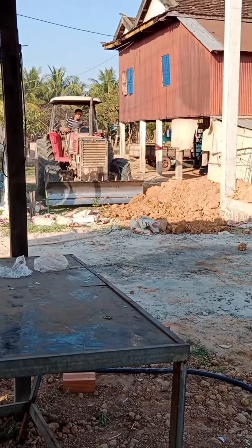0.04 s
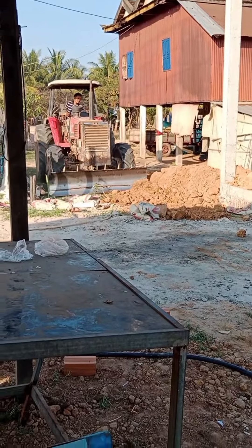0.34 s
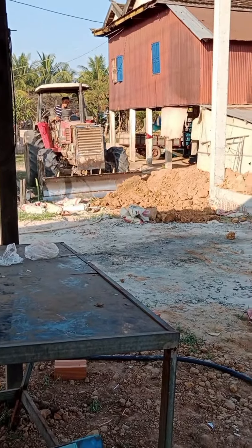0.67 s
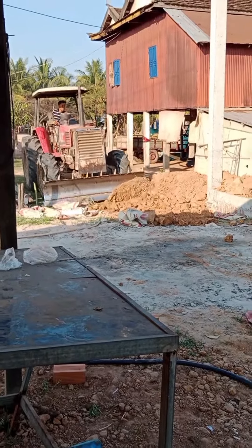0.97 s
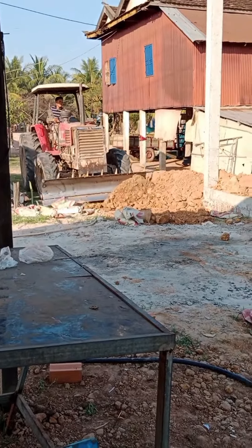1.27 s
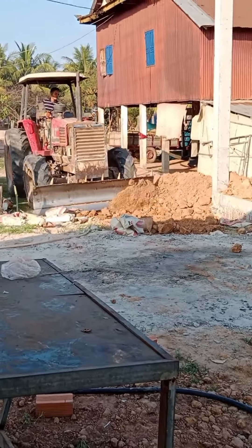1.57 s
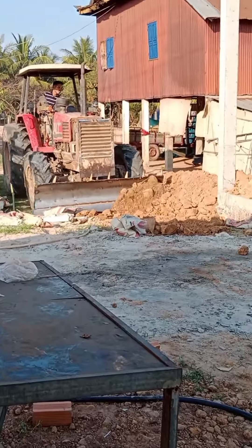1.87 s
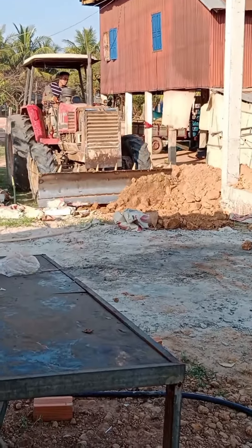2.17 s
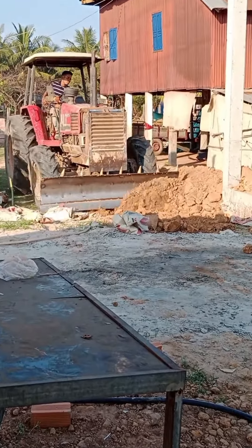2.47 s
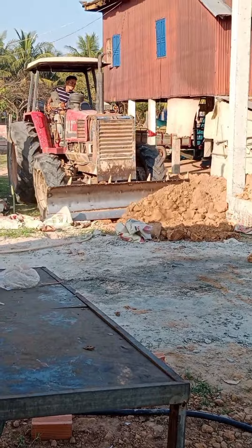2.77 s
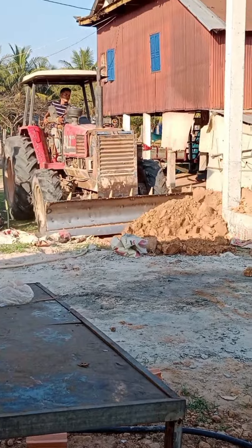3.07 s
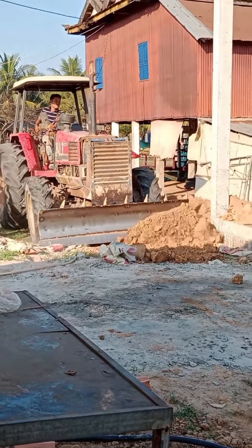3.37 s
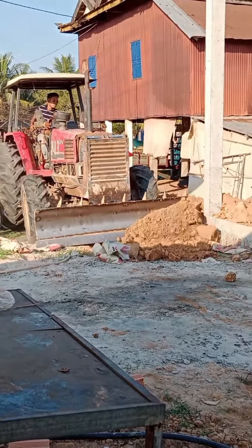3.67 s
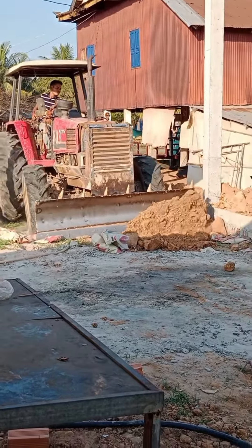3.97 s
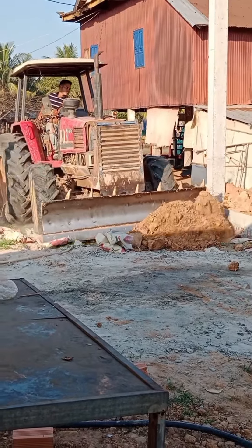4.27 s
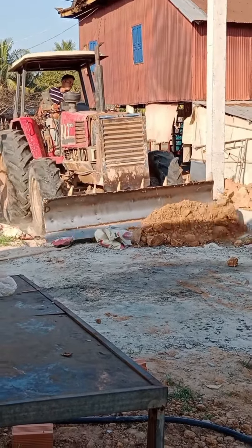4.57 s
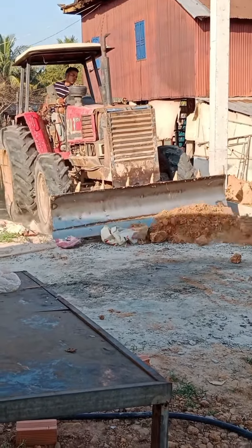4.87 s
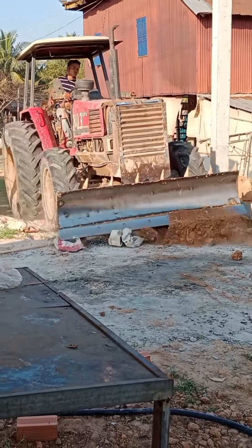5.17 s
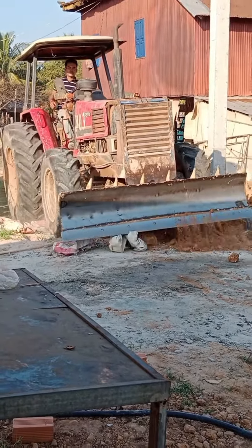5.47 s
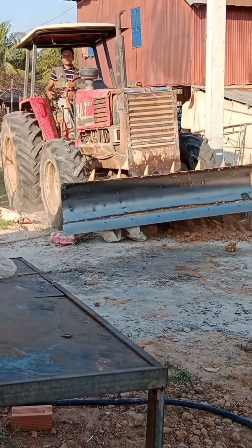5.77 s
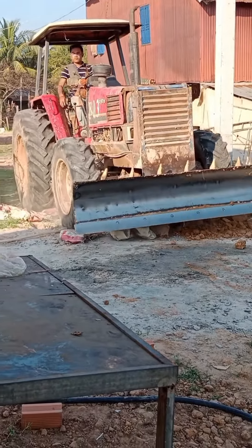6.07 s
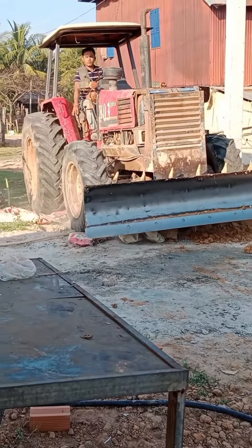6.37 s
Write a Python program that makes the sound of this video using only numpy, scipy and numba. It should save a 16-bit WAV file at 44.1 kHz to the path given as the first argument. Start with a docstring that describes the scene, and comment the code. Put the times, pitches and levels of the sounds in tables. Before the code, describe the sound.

A diesel tractor runs throughout in an open yard, with an uneven metallic rattle, clanking loose steel and a low rumble as its blade pushes soil and rubble. At about 0.6 seconds the blade hits rubble with a ringing clang, a boom and a scrape, and dry earth hisses faintly. A panel buzzes around 1 second. The engine eases and dips briefly between about 1.7 and 2.5 seconds, then grating returns. At 3 seconds a stone clinks sharply, with light steel pings until nearly 4 seconds. From about 4 to 5.7 seconds the tractor sounds nearer and louder, speeding up and barking in repeated surges with clanks, scrapes and deep thuds, the heaviest near 4.9 seconds. From about 5.8 seconds the engine slows and quietens with a falling gear whine, still running at the end, around 6.6 seconds.

```python
"""A diesel tractor pushes a heap of soil and rubble across a yard with its front blade, coming nearer.
Each firing shakes the block and tinwork; under load the engine barks in surges, then slows with a
falling gear whine. The blade booms, scrapes and clangs in the heap while the ground rumbles and soil
crumbles off it. Loose steel clanks and pings, a panel buzzes, and a struck stone clinks."""
import sys
import numpy as np
from scipy import signal
from scipy.fft import rfft, irfft
from scipy.io import wavfile
from scipy.ndimage import uniform_filter1d, map_coordinates
from numba import njit

SR = 44100
rng = np.random.default_rng(int(sys.argv[2]) if len(sys.argv) > 2 else 0)


def bounce(signal):
    """Save signal as a 16-bit WAV file at the path given by the first command-line argument."""
    frames = np.transpose(np.atleast_2d(signal))
    limited = np.clip(frames, -1, 1)
    pcm = np.round(limited * 32767).astype(np.int16)
    wavfile.write(sys.argv[1], SR, pcm)


N = 292632
TIME = np.arange(N) / SR


def undb(db):
    """Decibels to gain."""
    return 10 ** (np.asarray(db) / 20)


def unit(x):
    """Scale to rms 1."""
    return x / np.sqrt(np.mean(x ** 2) + 1e-20)


def curves(rows):
    """Automation lanes from rows of (t/s, values)."""
    s, *columns = np.transpose(rows)
    return [np.interp(TIME, s, c) for c in columns]


def walk(rate):
    """Smooth random drift of rms 1, through `rate` points a second."""
    steps = rng.standard_normal(8192)
    return unit(map_coordinates(steps, [TIME * rate], order=2, mode="wrap"))


def swell(s, length, attack_s, release_s):
    """Envelope that rises to 1 at time s, holds for length and dies away."""
    before = np.maximum((s - TIME) / attack_s, 0)
    after = np.maximum((TIME - s - length) / release_s, 0)
    return np.exp(-np.minimum(before + after, 30))


def swells(rows, attack_s, release_s):
    """Joint envelope of (t/s, length/s, level/dB) events."""
    return np.sqrt(sum((undb(db) * swell(s, length, attack_s, release_s)) ** 2
                       for s, length, db in rows))


def eq(x, points, size=2048):
    """Minimum-phase EQ through (f/Hz, gain/dB) points."""
    hz, db = np.transpose(points)
    freqs = np.maximum(np.fft.rfftfreq(size, 1 / SR), 1)
    cepstrum = irfft(np.log(undb(np.interp(np.log(freqs), np.log(hz), db))))
    cepstrum[1:size // 2] *= 2
    cepstrum[size // 2 + 1:] = 0
    return signal.fftconvolve(x, irfft(np.exp(rfft(cepstrum))))[:len(x)]


@njit
def sweep(x, hz, width):
    """State-variable band-pass whose centre may move."""
    y, band, low = np.empty(len(x)), 0., 0.
    for i in range(len(x)):
        g, damping = np.tan(np.pi * hz[i] / SR), width / hz[i]
        v = (band + g * (x[i] - low)) / (1 + g * (g + damping))
        band, low, y[i] = 2 * v - band, low + 2 * g * v, damping * v
    return y


def resonance(x, hz, width):
    """Band-pass parked on one pitch."""
    return sweep(x, np.full(len(x), float(hz)), float(width))


def even(x, seconds):
    """Leveller: take the slow swells out of a texture and leave its grain."""
    size = max(int(seconds * SR), 2)
    power = uniform_filter1d(uniform_filter1d(x ** 2, size), size)
    return x / np.sqrt(np.maximum(power, 0) + 1e-14)


def grains(rate, spread_db):
    """Tiny impacts of unequal size, about `rate` a second."""
    hit = rng.random(N) < rate / SR
    size = undb(spread_db * np.minimum(rng.exponential(size=N), 4))
    return unit(hit * size * rng.standard_normal(N))


def body(drive, modes, flicker_db, flicker_rate):
    """Shake (f/Hz, width/Hz, level/dB) resonances; the contact point wanders, so each comes and goes."""
    return sum(undb(db + flicker_db * walk(flicker_rate)) * (-1) ** k * resonance(drive, hz, width)
               for k, (hz, width, db) in enumerate(modes))


def ring_cloud(shake, band_hz, count, t60, spread_db, size):
    """Many short rings at random pitches in a band, as strong as the shaking when each starts."""
    when, pitch, strength, phase = rng.random((count, 4)).T
    start = (when * N).astype(int)
    hz = band_hz[0] + pitch * (band_hz[1] - band_hz[0])
    gain = shake[start] * undb(spread_db * np.minimum(-np.log(1 - strength), 4))
    t = TIME[:size]
    envelope = (1 - np.exp(-t / .0004)) * undb(-60 * t / t60)
    angle = 2 * np.pi * (hz[:, None] * t + phase[:, None])
    rings = gain[:, None] * envelope * np.sin(angle.astype(np.float32))
    return np.bincount((start[:, None] + np.arange(size)).ravel(), rings.ravel(), N)[:N]


def blow(modes, attack_s, detune):
    """One hit on (f/Hz, level/dB, t60/s) modes, peak 1; no two ring quite alike."""
    t = TIME[:SR // 4]
    hz, db, t60 = np.transpose(modes)[:, :, None]
    pitch, phase = rng.uniform(-0.99, 1, (2, len(modes), 1))
    rings = undb(db - 60 * t / t60) * np.sin(2 * np.pi * hz * (1 + detune * pitch) * t + np.pi * phase)
    out = rings.sum(0) * (1 - np.exp(-t / attack_s))
    return out / np.abs(out).max()


def add(track, s, sound):
    """Mix a sound in at time s."""
    i = max(int(s * SR), 0)
    track[i:i + len(sound)] += sound[:N - i]


# engine speed: t/s, firing rate/Hz
FIRING_RATE = [(0, 33.68), (.95, 33.53), (1.3, 32.04), (1.57, 33.98), (1.8, 32.27), (2.2, 30.83),
               (3.0, 30.23), (3.7, 30.25), (3.87, 31.14), (4.05, 33.76), (4.2, 36.11), (4.45, 35.1),
               (4.6, 37.09), (4.77, 35.54), (4.95, 37.87), (5.1, 36.02), (5.22, 37.47), (5.45, 35.03),
               (5.55, 39), (5.78, 36.85), (6.05, 33.45), (6.33, 30.62), (6.64, 27.9)]
# surges of load: hardest firing t/s, hold before/s, hold after/s, hardness/0-1, clatter/dB, bark/dB
SURGES = [(0.631, 0.0086, 0.0077, 0, -35.5, -37), (3.133, 0.0017, 0.049, 0, -40.5, -42.5),
          (3.706, 0.067, 0.073, 0.41, -36, -34.5), (4.051, 0.071, 0.053, 0.68, -34, -29),
          (4.305, 0.037, 0.038, 0.5, -31.5, -28.5), (4.498, 0.00058, 0.067, 0.81, -32, -24.5),
          (4.857, 0.048, 0.04, 0.67, -30.5, -22.5), (5.15, 0.012, 0.024, 0.86, -31, -24.5),
          (5.502, 0.026, 0.024, 0.8, -30.5, -24.5)]
SURGE_ATTACK_S, SURGE_RELEASE_S = 0.016, 0.046


def firings():
    """The engine's clock: seconds since the last firing, and how hard it is hitting."""
    rate, = curves(FIRING_RATE)
    cycles = np.cumsum(rate) / SR
    peaks = np.array(SURGES)[:, 0]
    offsets = np.unwrap(np.interp(peaks, TIME, cycles) % 1, period=1)
    cycles -= np.interp(TIME, peaks, offsets)  # every surge peaks on a firing
    hardness = sum(hard * swell(s - before, before + after, SURGE_ATTACK_S, release_s=0.031)
                   for s, before, after, hard, _, _ in SURGES)
    return cycles % 1 / rate, hardness


def beat(age, hardness, idle_depth, decay_s):
    """Envelope of each firing: a sharp blow that dies away, pumping deeper under load."""
    depth = np.clip(idle_depth + (1 - idle_depth) * hardness, 0, .95)
    pulse = (1 - np.exp(-age / .0013)) * np.exp(-age / decay_s)
    return even(1 - depth + depth * 3.4 * pulse, .04)


def strikes(age, gain, modes, scatter_db, colour_db, detune):
    """Each firing strikes (f/Hz, level/dB, t60/s) modes, never twice with the same force or colour."""
    out, t = np.zeros(N), TIME[:SR // 10]
    hz, db, t60 = np.transpose(modes)[:, :, None]
    for i in np.flatnonzero(np.diff(age) < 0) + 1:
        force, mix, pitch, phase = rng.standard_normal((4, len(modes), 1))
        decays = undb(db + colour_db * np.clip(mix, -1, 1) - 60 * t / t60)
        hit = (decays * np.sin(2 * np.pi * (hz * (1 + detune * pitch) * t + phase))).sum(0)
        hit *= 1 - np.exp(-t / .0016)
        add(out, i / SR, gain[i:i + SR // 200].max() * undb(scatter_db * np.tanh(force[0])) * hit)
    return out


# pushes, when the drive takes up load: t/s, length/s, clatter/dB, crumbling soil/dB
PUSHES = [(0, 0.078, -47, -67), (0.105, 0.23, -52.5, -66.5), (0.48, 0.043, -56, -65),
          (0.589, 0.48, -38, -57.5), (1.095, 0.498, -42.5, -61), (1.62, 0.026, -48, -63.5),
          (1.785, 0.24, -59, -77), (1.975, 0.11, -42, -61.5), (2.144, 0.03, -43, -63.5),
          (2.37, 0.24, -60, -73), (2.584, 0.53, -40, -58.5), (3.176, 0.42, -43, -58),
          (3.638, 0.22, -39.5, -59), (3.845, 0.12, -42, -57.5), (3.979, 1.805, -40, -57),
          (5.781, 0.54, -48.5, -67), (5.902, 0.027, -49, -67), (6.177, 0.019, -48, -76),
          (6.404, 0.21, -61, -81)]
# exhaust bark riding on the pushes: t/s, relative level/dB
EFFORT = [(0, -14), (1.0, -18), (1.4, -18), (2.1, -6.5), (2.7, -9.5), (3.5, -13.5), (3.9, -7), (4.2, 3),
          (4.7, -1.5), (5.35, 2.5), (5.7, -5.5), (5.95, 1.5), (6.3, -9.5), (6.64, 0.5)]
PUSH_ATTACK_S, PUSH_RELEASE_S, IDLE_DB = 0.013, 0.016, -70


def workload():
    """Envelopes of the steady pushing, the surges on top, and the bark both draw from the engine."""
    push = swells([(s, length, db) for s, length, db, _ in PUSHES], PUSH_ATTACK_S, PUSH_RELEASE_S)
    push = np.hypot(push, undb(IDLE_DB)) * undb(1.5 * walk(13))
    # the drive goes slack just before each surge
    slack = sum(np.exp(-((TIME - s + before + 0.078) / 0.014) ** 2) for s, before, *_ in SURGES)
    push *= undb(-1.5 * slack)
    peak, before, after, hardness, clatter_db, bark_db = np.transpose(SURGES)
    surge = swells(zip(peak - before, before + after, clatter_db), SURGE_ATTACK_S, SURGE_RELEASE_S)
    labour = swells(zip(peak - before, before + after, bark_db), SURGE_ATTACK_S, SURGE_RELEASE_S)
    accent = sum(hard * swell(s, 0.043, attack_s=0.0007, release_s=0.01)
                 for s, hard in zip(peak, hardness))
    labour *= undb(0.5 * accent)  # the hardest firing stands out
    effort_db, = curves(EFFORT)
    return push, surge, np.sqrt(labour ** 2 + (push * undb(effort_db)) ** 2 + undb(IDLE_DB) ** 2)


# resonances of block and tinwork: f/Hz, width/Hz, level/dB
TINWORK = [(955, 88, -15.5), (1103, 25.5, -3), (1360, 95, 0.5), (1464, 73, 2.5), (1544, 56, -1.5),
           (1782, 97, -3.5), (1884, 33, -1.5), (1974, 82, -2.5), (2378, 26, -9.5), (3217, 92, -5),
           (3820, 39, -13.5)]
# tone of the clatter: f/Hz, level/dB
CLATTER_EQ = [(150, -18), (400, 1), (650, -3), (830, -10.5), (960, -3.5), (1080, 4), (1190, 3), (1330, 1.5),
              (1600, 1.5), (1720, -1.5), (1900, -1.5), (2030, -4.5), (2130, -12), (2260, -1), (2450, 4),
              (2650, 3), (2930, -28), (3300, -11.5), (3550, -14.5), (3760, -6.5), (3950, -17),
              (5000, -21.5)]


def clatter(age, hardness, rattle):
    """Firings shake the block and tinwork into a gritty, metallic rattle."""
    shake = grains(2000, 2.5) * beat(age, hardness, idle_depth=0.039, decay_s=0.039)
    tin = body(shake, TINWORK, flicker_db=6.5, flicker_rate=18)
    return even(eq(tin, CLATTER_EQ), .03) * rattle * undb(-0.5)


# body of the exhaust bark: f/Hz, level/dB
BARK_EQ = [(130, -35.5), (300, -8.5), (480, 3.5), (630, -7.5), (750, 1), (830, 3.5), (920, 4), (1200, 2.5),
           (1500, 4), (2100, 1.5), (2500, -4), (2800, -18), (4000, -20.5), (5000, -48)]
# its bright edge: f/Hz, level/dB
BARK_EDGE_EQ = [(1500, -39), (2400, -8), (2750, -3.5), (3020, -3), (3300, 6), (3550, 4.5), (3800, -10),
                (4150, -29), (4500, -27), (4900, -31), (5400, -19), (6000, -21.5)]
# hollow resonances of the frame: f/Hz, width/Hz, level/dB
HOLLOWS = [(461, 78, -3.5), (726, 71, -8.5), (914, 89, -4.5), (1287, 27, -10.5), (1485, 100, -5.5),
           (1755, 13, -12.5), (1983, 27, -9), (2194, 40, -1), (3440, 290, -6)]
EDGE_DB, EDGE_KNEE_DB = -10.5, -35.5  # below the knee the edge fades faster than the bark


def exhaust_bark(age, hardness, effort):
    """Firings bark through the hollow frame, brighter the harder the engine works."""
    blows = beat(age, hardness, idle_depth=0.058, decay_s=0.0046)
    bursts = ring_cloud(blows, (300, 5500), count=14000, t60=.04, spread_db=1.4, size=1000)
    bark = eq(bursts, BARK_EQ)
    bark = even(bark + body(bark, HOLLOWS, flicker_db=5.5, flicker_rate=20), .028)
    edge = even(eq(bursts, BARK_EDGE_EQ), .028)
    brightness = undb(EDGE_DB) * np.minimum(effort / undb(EDGE_KNEE_DB), 1)
    duck = 1 - 0.27 * hardness  # makes room for the block's knocks
    return (bark + brightness * edge) * effort * duck


# modes of the loose bonnet: f/Hz, level/dB, t60/s
BONNET = [(1034, -3.5, 0.064), (1404, -1.5, 0.072), (1493, 1, 0.033), (1900, 1.5, 0.082), (2010, -7, 0.084),
          (2300, -20, 0.11), (3710, -38, 0.14), (4340, -28.5, 0.088), (7070, -30, 0.026)]
# modes of the engine block: f/Hz, level/dB, t60/s
BLOCK = [(351.4, -4.5, 0.074), (472.5, 2, .08), (717, -9.5, 0.061), (930, -5, 0.021), (1530, -1.5, 0.026),
         (2166, -3, 0.035), (3480, -8, 0.038), (3560, -15, 0.04), (4010, -16, 0.054), (4520, -20, 0.024),
         (5660, -36, 0.019), (6130, -15, 0.027), (7160, -12, 0.032)]


def slaps_and_knocks(age, hardness, rattle, effort):
    """Each firing slaps the bonnet and, under load, knocks the block."""
    slaps = strikes(age, rattle * undb(-5.5), BONNET, scatter_db=8, colour_db=6.5, detune=0.016)
    knocks = strikes(age, effort * hardness * undb(5.5), BLOCK, scatter_db=4, colour_db=0.5, detune=0.03)
    return slaps + knocks


# gear whine riding on the pushes: t/s, second harmonic/dB, third harmonic/dB
WHINE = [(0, -42, 6), (.15, -40, -33), (.62, -34, -13), (.8, -26, -13.5), (1.0, -15, -15), (1.2, -18, -18),
         (1.55, -14, -15.5), (1.75, 2.5, -8), (2.1, -12.5, -16), (2.6, -24, -32), (3.4, -12, -38),
         (3.9, -9, -15), (4.3, -12, -13), (5.0, -2.5, -15.5), (5.4, -4.5, -8), (5.75, -8, -23.5),
         (6.02, 3, -4.5), (6.12, -3, -27), (6.2, 4.5, -15), (6.32, -13.5, -14), (6.42, 6, -21),
         (6.64, 2, -36)]
MESHES_PER_FIRING, WHINE_FLUTTER, WHINE_ROUGHNESS = 33.6, .026, .9


def gear_whine(age, push):
    """Gear mesh tones with a rough fringe, fluttering with the uneven turning of the crank."""
    hz = MESHES_PER_FIRING * curves(FIRING_RATE)[0]
    kick = signal.sosfilt(signal.butter(3, 90, fs=SR, output="sos"), np.exp(-age / .012))
    flutter = 1 + WHINE_FLUTTER * (kick - kick.mean()) + 0.0032 * walk(12)
    phase = 2 * np.pi * np.cumsum(hz * flutter) / SR
    out = 0
    for k, db in enumerate(curves(WHINE), 2):
        fringe = walk(140) * np.sin(k * phase) + walk(140) * np.cos(k * phase)
        tone = np.sin(k * phase) + WHINE_ROUGHNESS * fringe
        out += undb(db - 1 + 3 * walk(24)) * even(tone * (1 + kick), .03)
    return out * push


# the blade catches in the heap: t/s, length/s, level/dB, starting f/Hz
BOOMS = [(0, 0.018, -42, 330), (0.192, 0.048, -46, 328), (0.487, 0.088, -49.5, 338),
         (0.6, 0.076, -36.5, 320), (0.66, 0.029, -32.5, 240), (0.64, 0.062, -41.5, 560),
         (0.68, .05, -32.5, 370), (0.753, 0.11, -41, 348), (0.961, 0.096, -37.5, 284),
         (1.238, 0.053, -41.5, 338), (1.411, 0.014, -40, 257), (1.469, 0.072, -39.5, 182),
         (1.848, 0.13, -57.5, 380), (1.99, 0.083, -39.5, 390), (2.174, 0.0072, -53, 280),
         (2.612, 0.015, -42.5, 338), (2.825, 0.055, -42.5, 322), (3.189, 0.051, -47, 416),
         (3.314, 0.13, -39, 405), (3.712, 0.12, -39, 495), (3.945, 0.073, -36.5, 382),
         (4.208, 0.2, -35.5, 365), (4.64, 0.037, -37.5, 322), (4.509, .02, -33, 486),
         (4.838, 0.021, -24, 475), (4.858, 0.018, -27.5, 135), (4.896, 0.034, -29, 258),
         (5.027, 0.067, -40.5, 330), (5.153, 0.03, -29.5, 440), (5.195, 0.03, -35.5, 276),
         (5.31, 0.053, -44.5, 310), (5.536, 0.016, -32.5, 327), (5.626, 0.073, -39, 492),
         (5.761, 0.025, -43.5, 321.4), (6.021, 0.015, -44, 256)]
# tone of its broad thud: f/Hz, level/dB
BOOM_EQ = [(60, -34), (130, -5), (250, 0.5), (500, -7), (640, -41.5), (1000, 1.5), (3000, -14.5)]
DRAG_DB, DRAG_HZ, SAG_HZ_PER_S = -7.5, 403, 416  # drag level is relative to the bark


def blade_boom(age, hardness, effort):
    """The blade drones as it drags and booms as it catches, sagging in pitch as soil piles up."""
    power = (effort * undb(DRAG_DB)) ** 2
    weighted_hz = power * DRAG_HZ
    for s, length, db, start_hz in BOOMS:
        catch = (undb(db) * swell(s, length, attack_s=0.02, release_s=0.017)) ** 2
        power += catch
        weighted_hz += catch * (start_hz - SAG_HZ_PER_S * (TIME - s))
    hz = np.clip(weighted_hz / power, 100, 700)  # the loudest boom leads the pitch
    drag = grains(1500, 1.8) * beat(age, hardness, idle_depth=0.18, decay_s=0.0032)
    hum = even(sweep(sweep(drag, hz, 60.), hz, 300.), .022)
    thud = even(eq(sweep(drag, hz, 49.), BOOM_EQ), 0.11)
    broad = np.clip(0.41 + 0.13 * hardness, 0, 1)  # hard blows excite a broader band
    boom = unit(even((1 - broad) * hum + broad * thud, 0.044))
    return boom * np.sqrt(power) * undb(2.2 * walk(18))


# weight of the ground: f/Hz, level/dB
RUMBLE_EQ = [(20, -20), (35, -11), (48, -12), (62, 0), (79, -3.5), (100, 3.5), (130, -6), (180, -14.5),
             (300, -16), (600, -75.5)]
# heavy thuds through the ground: t/s, length/s, level/dB
THUDS = [(.97, 0.081, -46), (1.505, 0.025, -39), (2.06, .015, -57), (2.635, 0.051, -44),
         (2.75, 0.0085, -48), (3.72, 0.039, -48), (4.07, .03, -41), (4.2, 0.016, -38), (4.53, 0.05, -36),
         (4.855, 0.016, -22), (4.91, 0.057, -34), (5.04, 0.04, -44), (5.19, 0.033, -33.5),
         (5.52, 0.06, -34.5), (5.98, 0.014, -46)]
ROLL_DB, USUAL_PUSH_DB, IDLE_RUMBLE_DB = -53, -40, -89


def ground_rumble(age, hardness, push):
    """The ground rolls with the load and thuds, deepest around the surges, when the machine strains."""
    shake = grains(900, 0.97) * beat(age, hardness, idle_depth=0.46, decay_s=0.0081)
    deep = unit(eq(shake, RUMBLE_EQ))
    shallow = unit(eq(deep, [(45, -9), (75, -13.5), (110, -7.0), (170, -0.5)]))
    shudder = even(resonance(deep, hz=79, width=7), 0.079)  # the frame's own low note
    strain = np.clip(3 * uniform_filter1d(hardness, SR // 4), 0, 1)
    heavy = even(strain * (deep + undb(-5) * shudder) + (1 - strain) * shallow, 0.0079)
    thuds = heavy * swells(THUDS, attack_s=0.011, release_s=0.014)
    rolling = np.hypot(undb(ROLL_DB) * (push / undb(USUAL_PUSH_DB)) ** 0.55, undb(IDLE_RUMBLE_DB))
    return (thuds + even(shallow, .04) * rolling) * undb(2.2 * walk(22))


# soil sliding off the heap: t/s, length/s, level/dB
SPILLS = [(0, 0.028, -49), (.578, 0.12, -48.5), (.88, 0.13, -54), (2.81, 0.11, -55), (3.03, 0.12, -56.5),
          (3.85, 0.0088, -46.5), (5.23, 0.22, -51), (6.09, 0.012, -55.5)]
# tone of crumbling earth: f/Hz, level/dB
CRUMBLE_EQ = [(3500, -13), (4400, -8), (4900, -23), (5300, -16.5), (5900, -14.5), (6550, 8.5), (7150, 1.5),
              (7700, 5.5), (8900, 3.5), (9500, -4), (10200, -4), (11400, -16), (12800, -14.5), (13800, -29),
              (15500, -25)]
# air on the hiss, a shelf above AIR_HZ: t/s, level/dB
AIR = [(0, -21), (.6, -2), (.64, 13), (.72, -10), (1.0, -7), (2.1, 7), (2.7, 1), (3.1, 0), (3.7, -1),
       (4.2, 10), (5.35, 11.5), (5.6, -1), (6.64, 11)]
AIR_HZ, SURGE_SOIL_DB, IDLE_SOIL_DB = 11250, -15, -76.5


def soil(age, hardness, surge):
    """Dry earth hisses off the heap and chips tinkle in it, shaken loose in time with the engine."""
    pushed = swells([(s, length, db) for s, length, _, db in PUSHES], PUSH_ATTACK_S, PUSH_RELEASE_S)
    spilled = swells(SPILLS, attack_s=0.0067, release_s=0.016)
    shaken = surge * undb(SURGE_SOIL_DB)
    flow = np.sqrt(pushed ** 2 + spilled ** 2 + shaken ** 2 + undb(IDLE_SOIL_DB) ** 2)
    shake = beat(age, hardness, idle_depth=.15, decay_s=.012) * undb(2.5 * walk(45))
    chips = ring_cloud(shake, (3800, 15500), count=10000, t60=.05, spread_db=2.3, size=1300)
    earth = unit(shake * rng.standard_normal(N)) * (.75 + .6 * hardness)
    crumbs = even(eq(unit(chips) + earth, CRUMBLE_EQ), .03)
    air = signal.sosfiltfilt(signal.butter(4, AIR_HZ, "high", fs=SR, output="sos"), crumbs)
    air_db, = curves(AIR)
    return (crumbs - air + air * undb(air_db)) * flow * undb(0.49 * walk(16))


# hits on loose steel: t/s, peak level/dB, favoured f/Hz
CLANKS = [(0.036, -30.5, 1570), (.127, -39.5, 1790), (0.201, -33.5, 1370), (0.281, -38, 1810),
          (.438, -45, 1750), (0.763, -37, 1860), (0.927, -29, 1550), (1.082, -28, 1430), (1.097, -33, 1800),
          (1.166, -29.5, 1450), (1.225, -28.5, 1840), (1.276, -31, 1830), (1.311, -32, 1420),
          (1.352, -34, 1460), (1.438, -28.5, 1860), (1.462, -27, 1430), (1.611, -30.5, 1870),
          (1.788, -42, 1710), (1.965, -37, 1870), (2.156, -42, 1850), (2.17, -33.5, 1370),
          (2.351, -47.5, 1700), (2.57, -30.5, 1360), (2.669, -32, 1380), (2.964, -29.5, 1840),
          (2.982, -26.5, 1440), (3.123, -25, 1420), (3.329, -27.5, 1480), (3.489, -29, 1390),
          (3.54, -31, 1460), (3.577, -25.5, 1380), (3.608, -24, 1440), (3.64, -28, 1480),
          (3.991, -23.5, 1400), (4.05, -21.5, 1470), (4.468, -24, 1520), (4.499, -23, 1490),
          (4.772, -20, 1537), (4.804, -24, 1630), (5.095, -23, 1520), (5.153, -23, 1520),
          (5.446, -20.5, 1740), (6.067, -31, 1730)]
# modes of the loose steel: f/Hz, level/dB, t60/s
STEEL = [(1056, -16, 0.056), (1358, -3, 0.065), (1465, -0.5, 0.049), (1566, -1.5, 0.067), (1830, 2, 0.047),
         (1894, -6.5, 0.09), (1992, -4.5, 0.052), (2370, -15, 0.048), (3590, -10, 0.036),
         (6900, -10, 0.057), (7800, -16, .04)]
FOCUS_DB, FOCUS_WIDTH_HZ = 14, 200


def steel_clanks():
    """Loose parts clank with a tick of contact; the struck spot favours the modes near one pitch."""
    out = np.zeros(N)
    tick_eq = [(200, -4), (1000, 4), (2500, 0.5), (4000, -14),
               (5200, -19.5), (6600, -15), (9000, -4), (12000, -23)]
    for s, db, favoured_hz in CLANKS:
        modes = [(hz, level + FOCUS_DB * np.exp(-((hz - favoured_hz) / FOCUS_WIDTH_HZ) ** 2), t60)
                 for hz, level, t60 in STEEL]
        add(out, s, undb(db) * blow(modes, attack_s=0.0019, detune=0.022))
        tick = eq(rng.standard_normal(1200) * np.exp(-TIME[:1200] / 0.0069), tick_eq)
        add(out, s, undb(db - 17.5) * tick / np.abs(tick).max())
    return out


# rubble grating along the blade: t/s, length/s, level/dB, rasp f/Hz, width/Hz
GRATES = [(0.571, 0.039, -37.5, 3500, 1100), (0.606, 0.039, -30.5, 2700, 400),
          (0.601, 0.077, -38, 4250, 900), (0.87, 0.21, -44.5, 3560, 450), (1.991, 0.064, -43.5, 2520, 800),
          (2.606, 0.04, -43.5, 2630, 800), (2.804, 0.054, -37, 2700, 900), (2.893, 0.04, -31.5, 3220, 700),
          (2.928, 0.15, -46, 2630, 400), (3.117, 0.079, -35, 2380, 800), (3.67, 0.15, -38.5, 3150, 1200),
          (4.311, 0.0087, -23, 3520, 400), (4.931, 0.058, -28, 3050, 900)]
# tone of the grit: f/Hz, level/dB
SCRAPE_EQ = [(300, 7), (900, 12), (1500, 32), (2500, 13), (3500, 3), (4200, -17), (4900, -26), (5600, 0),
             (6600, -12), (11000, -19), (15000, -40)]
# resonances of the blade's edge: f/Hz, width/Hz, level/dB
BLADE_EDGE = [(2656, 46, 2), (3080, 36, 3), (3354, 20, 11), (3646, 29, -10), (5500, 90, -14),
              (6220, 110, -12), (6950, 150, -12), (7800, 140, -28), (11140, 99, -19)]


def rubble_scrapes():
    """Lumps rasp along the blade and set its edge ringing."""
    out = np.zeros(N)
    grit = eq(grains(6000, 0.35), SCRAPE_EQ)
    edge = body(grains(2200, 0.83), BLADE_EDGE, flicker_db=6.5, flicker_rate=25)
    edge = undb(-12) * even(edge, 0.018)
    for s, length, db, hz, width in GRATES:
        progress = TIME[:SR // 4] / length
        envelope = (1 - np.exp(-progress / .15)) * np.exp(-progress ** 3)
        span = slice(int(s * SR), int(s * SR) + len(progress))
        rasp = resonance(resonance(grit[span], hz, width), hz, 2 * width)
        add(out, s, undb(db) * (0.79 * even(rasp, 0.0083) + edge[span]) * envelope)
    return out


# hits on the blade's plate: t/s, peak level/dB
CLANGS = [(.572, -35), (0.614, -26.5), (.629, -20.5), (0.656, -29), (.68, -29.5)]
# modes of the plate: f/Hz, level/dB, t60/s
PLATE = [(230, -2, .12), (313.3, -9, 0.41), (424, -4, .2), (522, -2.5, 0.22), (592, -8.5, 0.17),
         (1020, -18, 0.1), (1308, 5, .14), (1550, -4, 0.11), (1630, 4, .12), (1790, -4, 0.13),
         (1950, -6.5, .16), (2420, -4, .15), (2630, -3, 0.13), (3950, -6, 0.083)]


def blade_clangs():
    """The blade's plate runs into rubble and rings."""
    out = np.zeros(N)
    for s, db in CLANGS:
        add(out, s, undb(db) * blow(PLATE, attack_s=0.0012, detune=.015))
    return out


# hits on a thin steel part: t/s, peak level/dB, f/Hz
PINGS = [(0.858, -46, 4340), (2.812, -58, 4310), (2.882, -54, 4190), (3.128, -63, 4410), (3.16, -49, 4180),
         (3.197, -56, 4130), (3.299, -51, 4200), (3.333, -58, 4150), (3.369, -64, 4180), (3.439, -46, 4190),
         (3.473, -59, 4100), (3.543, -60, 4130), (3.579, -43, 4190), (3.61, -53, 4270),
         (3.645, -45.5, 4260), (3.678, -49, 4400), (3.707, -41, 4520), (3.741, -51, 4540),
         (3.773, -55, 4360)]


def steel_pings():
    """A thin part pings on a close pair of modes, mostly once a firing."""
    out, t60 = np.zeros(N), 0.054
    for s, db, hz in PINGS:
        pair = [(hz, 0, t60), (hz + 71, -9, t60)]
        add(out, s, undb(db) * blow(pair, attack_s=0.0024, detune=0.0038))
    return out


# spells of panel buzz: t/s, length/s, level/dB
BUZZES = [(.88, 0.4, -44.5), (1.3, 0.16, -45), (2.6, 0.427, -48.5), (6.22, 0.089, -47.5)]
PANEL_HZ, PANEL_WIDTH_HZ = 1017, 57


def panel_buzz(age, hardness):
    """One loose sheet of the bodywork, set buzzing by the firings."""
    shake = grains(1500, 1.9) * beat(age, hardness, idle_depth=0.2, decay_s=0.046)
    buzz = resonance(resonance(shake, PANEL_HZ, PANEL_WIDTH_HZ), PANEL_HZ, 2 * PANEL_WIDTH_HZ)
    return even(buzz, 0.056) * swells(BUZZES, attack_s=0.039, release_s=0.0078)


# hits on a stone: t/s, peak level/dB
CLINKS = [(3.01, -15), (3.052, -28.5)]
# modes of the stone: f/Hz, level/dB, t60/s
STONE = [(2497, 17, 0.068), (2740, -22, 0.13), (2530, 0, 0.097), (4180, -17, 0.12), (5100, -24, 0.17),
         (5100, -19, 0.26), (7100, 4, 0.046), (7900, -1.5, 0.099), (9930, -6, 0.052), (10000, -1.5, 0.082),
         (12800, -12, 0.11)]


def stone_clinks():
    """Struck by the blade, a stone rings sharp and unsteady while it skids."""
    out, t = np.zeros(N), TIME[:SR // 2]
    ring = sum(undb(db - 60 * t / t60) * np.sin(2 * np.pi * hz * t) for hz, db, t60 in STONE)
    ring /= np.abs(ring).max()
    skid = 0.053 * np.exp(-t / 0.0056)
    attack = (1 - np.exp(-t / 0.002)) ** 2
    for s, db in CLINKS:
        speed = 1 + skid + 0.015 * walk(464)[:len(t)]
        clink = map_coordinates(ring, [np.cumsum(speed)])
        add(out, s, clink * attack * undb(db + 2.1 * walk(340)[:len(t)]))
    return out


def yard(x, wet_db, t60):
    """Short, dull reflections from the house and the ground."""
    t = TIME[:SR // 2]
    tail = rng.standard_normal(len(t)) * undb(-60 * t / t60) * (t > .008)
    tail = eq(tail, [(200, 12.0), (2500, 7.5), (9000, 1.1)])
    return x + undb(wet_db) * np.std(x) * unit(signal.fftconvolve(x, tail)[:N])


def scene():
    """Engine, blade and rubble, mixed to mono in the open yard."""
    age, hardness = firings()
    push, surge, effort = workload()
    rattle = np.hypot(push, surge)
    engine = clatter(age, hardness, rattle) + exhaust_bark(age, hardness, effort)
    engine += slaps_and_knocks(age, hardness, rattle, effort) + gear_whine(age, push)
    low_end = blade_boom(age, hardness, effort) + ground_rumble(age, hardness, push)
    debris = soil(age, hardness, surge) + rubble_scrapes() + stone_clinks()
    metal = blade_clangs() + steel_clanks() + steel_pings() + panel_buzz(age, hardness)
    return yard(engine + low_end + debris + metal, wet_db=-8.0, t60=0.037)[None]


def record(dry):
    """The microphone has a narrow dip in the treble and loses the deepest bass; the top is cut."""
    dipped = eq(dry[0], [(4550, -3.5), (4750, -10.5), (4880, -16), (5060, -9.0), (5600, -4.5)])
    thinned = signal.sosfilt(signal.butter(4, 41, "high", fs=SR, output="sos"), dipped)
    return signal.sosfilt(signal.ellip(10, .2, 80, 15550, fs=SR, output="sos"), thinned)[None]


dry = scene()
out = record(dry)
bounce(out)
```